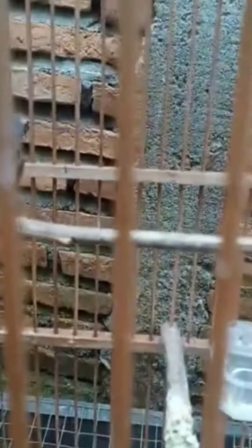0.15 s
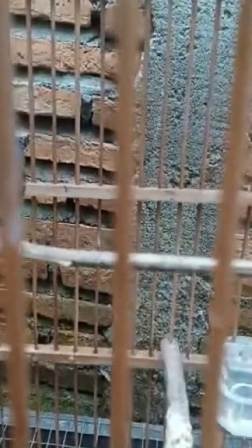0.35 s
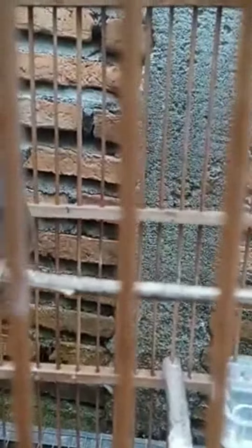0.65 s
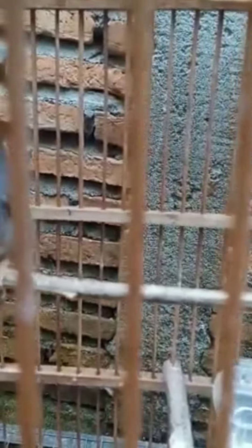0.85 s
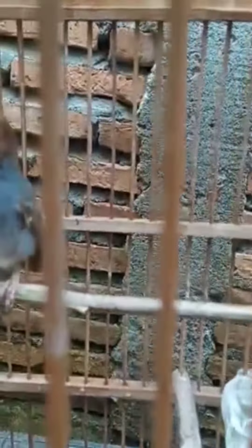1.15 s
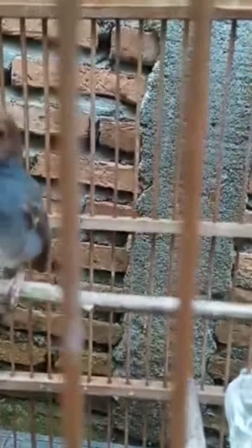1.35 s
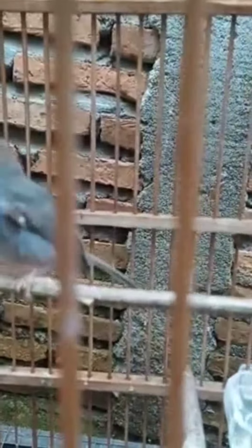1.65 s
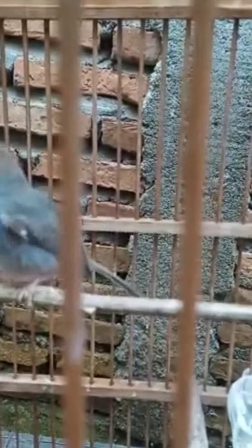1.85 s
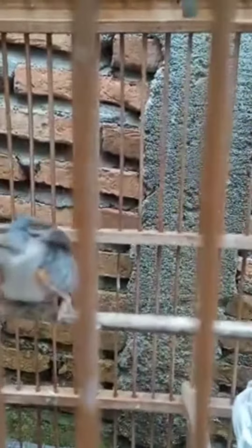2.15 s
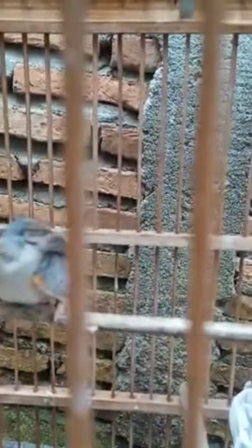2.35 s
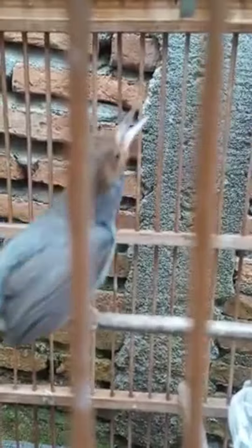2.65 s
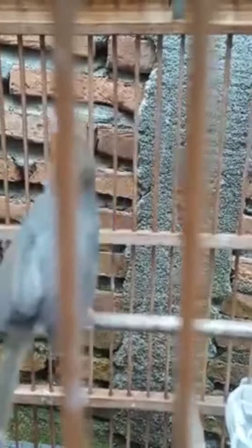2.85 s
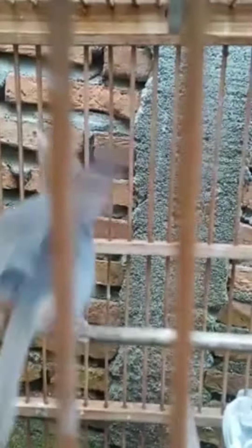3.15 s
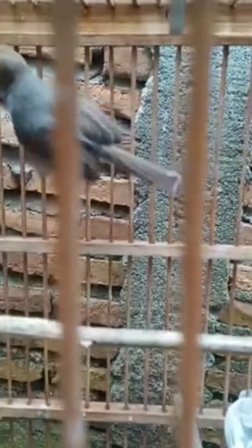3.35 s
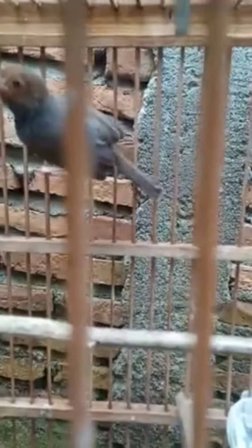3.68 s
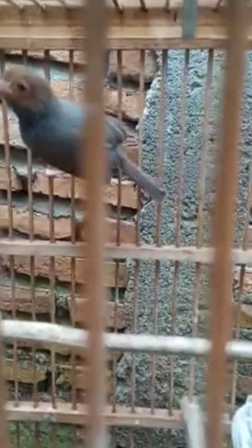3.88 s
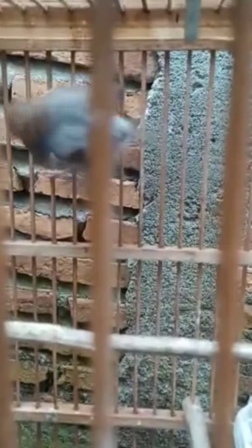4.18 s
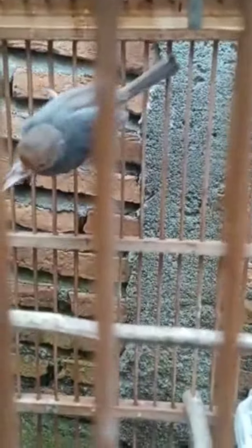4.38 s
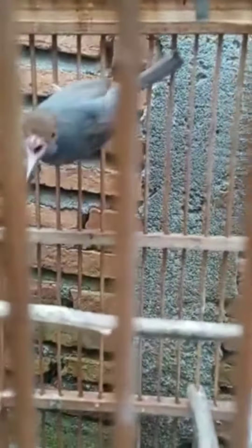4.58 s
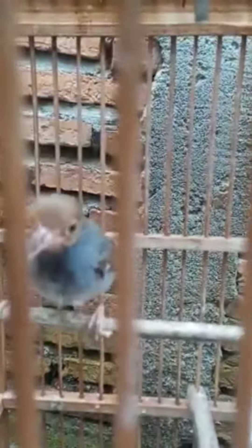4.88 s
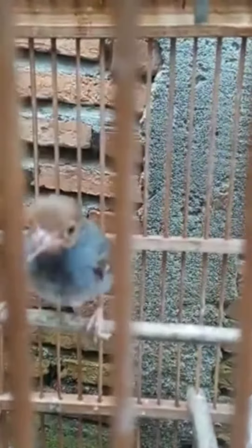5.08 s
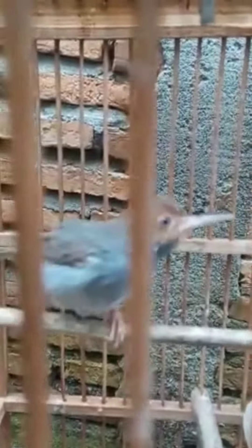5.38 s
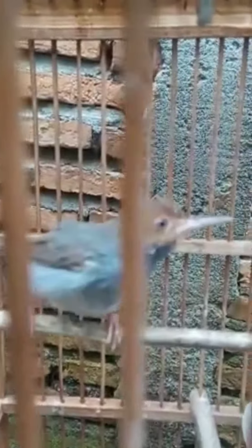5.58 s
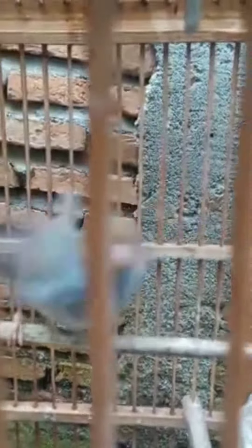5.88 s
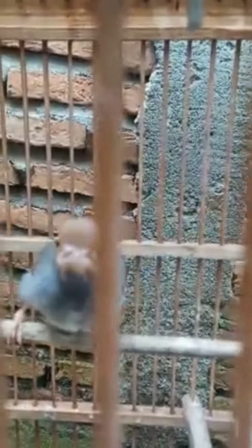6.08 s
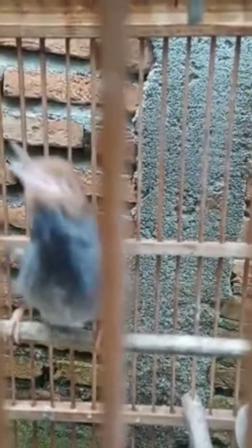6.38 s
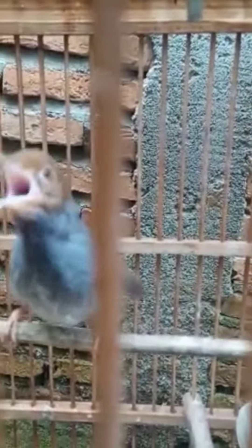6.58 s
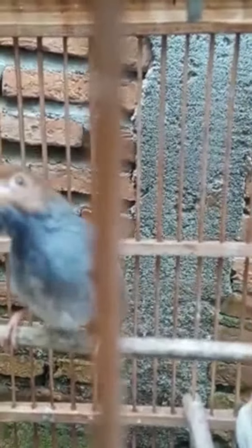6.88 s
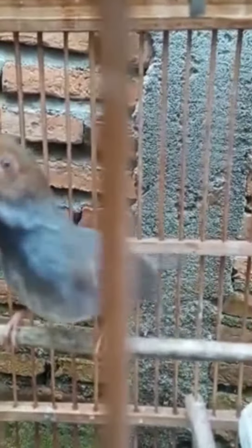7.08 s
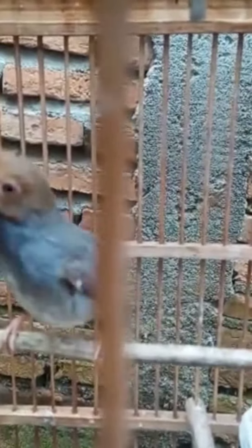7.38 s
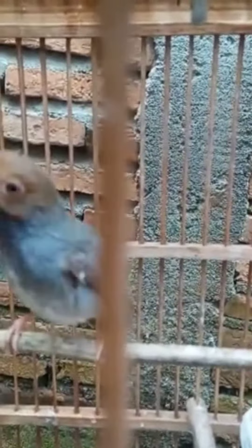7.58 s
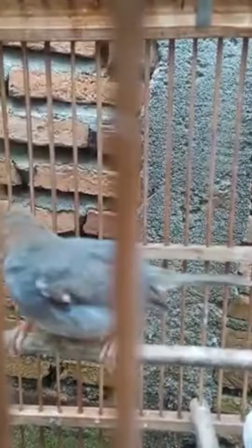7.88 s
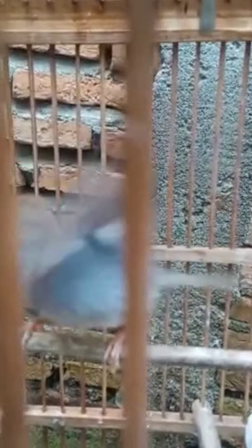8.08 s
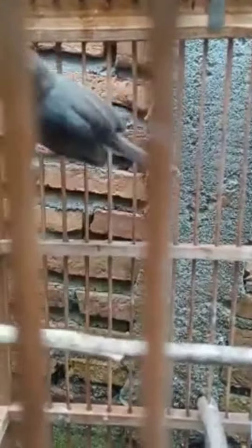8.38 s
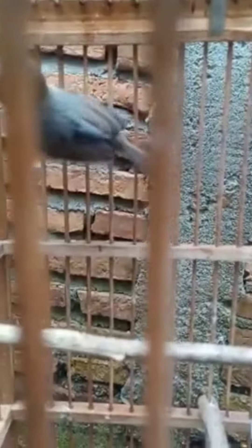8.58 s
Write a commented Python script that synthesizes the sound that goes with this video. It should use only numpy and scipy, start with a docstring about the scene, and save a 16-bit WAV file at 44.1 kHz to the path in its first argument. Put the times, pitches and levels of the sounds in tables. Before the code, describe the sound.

A small caged bird sings sharp whistled phrases and quick trills close by, over faint distant chirps and quiet outdoor hiss.

```python
"""A sharp falling 'chew' runs into a trill: a tailorbird, close by in a wooden cage against a brick wall.
Its phrases are a swoop, a long whistle, a pip and a chew, all near-pure gliding tones that roughen in
fast sweeps. Dry snaps lead into some phrases, trills run on from others, and each chew has a soft thump.
The yard rings briefly after each note. Claws tick, the cage rustles and far birds chirp
over a quiet bed of outdoor rumble and hiss."""
import sys
import numpy as np
from scipy import signal
from scipy.fft import rfft, irfft, next_fast_len
from scipy.io import wavfile
from scipy.ndimage import uniform_filter1d

SR = 44100
rng = np.random.default_rng(int(sys.argv[2]) if len(sys.argv) > 2 else 0)


def bounce(signal):
    """Save signal as a 16-bit WAV file at the path given by the first command-line argument."""
    frames = np.transpose(np.atleast_2d(signal))
    limited = np.clip(frames, -1, 1)
    pcm = np.round(limited * 32767).astype(np.int16)
    wavfile.write(sys.argv[1], SR, pcm)


N = 384993
LEAD = SR // 10  # pre-roll in samples: the song is already under way at time zero
PIP_BEFORE_S = 0.036  # from a pip to its chew

# Phrase openings: swoop t/s; the whistle's length factor, pitch factor, level/dB, bend/share of pitch,
# swell/dB, brightness/dB; the swoop's pitch factor, level/dB
OPENINGS = [(.44, 1.025, 1.006, 0.1, 0.014, -2, 1, 0.99, 0),
            (2.5541, 1.012, 1.004, -1, -0.017, -0.5, -2, 1.02, 1.5),
            (3.2355, 1.01, 1.006, 0, -0.0024, -1, -5, 1.007, 0.5),
            (4.3925, 1.085, .996, -3.5, -0.028, -7, 6.5, 1.022, 2),
            (6.3303, 1.125, .989, -0.5, -0.0016, -3, 2.5, 0.982, 0),
            (7.026, 1.235, .96, -4, -0.084, -3, 5, 1.045, -.5),
            (8.4235, 1.067, .989, -3, .005, -2, -2, 1.014, -2.5)]
# Phrase endings: the chew's t/s, length factor, pitch factor, level/dB, bend/share of pitch, swell/dB;
# the pip's pitch factor, level/dB
ENDINGS = [(-.039, 0.99, 1.007, -3, 0, 1, 0.88, 0), (.67, 1.135, 1.006, .5, 0.042, -6.5, 0.99, -.5),
           (2.7823, 1.02, 1, -1.5, .025, -4.5, 1, -.5), (3.464, .99, 1.054, 0.8, 0.077, 14, 0.99, -0.5),
           (4.6229, 1.044, 1.003, -3, 0, -5.5, .99, -1.5), (6.5713, 1.015, 0.96, -1.95, -.037, -7, 1, -0.5),
           (7.2816, 1.17, .986, -3.5, -0.0014, -11, 0.95, -0.5),
           (8.6563, 1.005, 1.006, -1.4, 0.101, 0.5, 0.99, -1.1)]
# Overtones of swoops and trills: multiple of the pitch, level/dB
SWEEP_OVERTONES = [(2, -30.5), (3, -41), (4, -40.5), (5, -44), (6, -44)]


def whistle_course(length_s=0.12, low_hz=1674, top_hz=3028.4, sag_hz=110, top_s=.06):
    """The whistle scoops up into a shallow arch of pitch, with an accent on arrival and a later swell."""
    t = np.linspace(0, length_s, 200)
    arch = top_hz - sag_hz * ((t - top_s) / (length_s - top_s)) ** 2
    hz = low_hz + (arch - low_hz) / (1 + np.exp((.0112 - t) / .0031))  # scoop centred on 11 ms
    attack_db = -10.5 * np.clip(1 - t / 0.026, 0, 1)
    accent_db = 10.5 * np.exp(-((t - 0.019) / .0068) ** 2)
    swell_db = -7.5 - ((t - 0.079) / 0.018) ** 2
    release_db = 20 * np.log10(np.clip((length_s - t) / .0076, .02, 1))
    return np.column_stack([t, hz, attack_db + accent_db + swell_db + release_db])


def whistles(after_swoop_s=0.031):
    """The long held note: the throat picks out the second partial of a voice an octave lower."""
    # Faint partials of that voice: multiple of the pitch, level/dB
    partials = [(.5, -60), (1.5, -49.5), (2, -41.5), (2.5, -56.5), (3, -44), (4, -56), (4.5, -53),
                (5, -43.5)]
    notes = [(s + after_swoop_s, *manner) for s, *manner, _, _ in OPENINGS]
    return song(notes, whistle_course(), partials, rough=.001, rasp_db=-56)


def swoops():
    """A quick dive in pitch leads into each whistle."""
    # Pitch and level contour: t/s, f/Hz, level/dB
    course = [(0, 3885, -50), (.0022, 3425, -15.5), (.0037, 3027, -12), (.0063, 2443, -26),
              (.0105, 2250, -23), (.016, 2055, -23), (.0198, 1984, -36), (.025, 1713, -55)]
    notes = [(s, 1, pitch, db) for s, *_, pitch, db in OPENINGS]
    return song(notes, course, SWEEP_OVERTONES, rough=.008, rasp_db=-33.5)


def pips():
    """A short, slightly falling note just ahead of each chew."""
    # Pitch and level contour: t/s, f/Hz, level/dB
    course = [(0, 4093, -40.5), (.0021, 3977, -12), (.006, 3796, -6), (.0113, 3720, -9),
              (.0171, 3582, -11.5), (.021, 3555, -30), (.0245, 3427, -49)]
    # Overtones: multiple of the pitch, level/dB
    partials = [(2, -29), (3, -42.5), (4, -54.5)]
    notes = [(s - PIP_BEFORE_S, stretch, pitch, db) for s, stretch, *_, pitch, db in ENDINGS]
    return song(notes, course, partials, rough=0.0016, rasp_db=-46)


def chews():
    """The closing note hangs high for a moment, then plunges."""
    # Pitch and level contour: t/s, f/Hz, level/dB
    course = [(0, 4900, -38.5), (.0014, 4635, -9.5), (.0046, 4501, -11), (0.0132, 4438, -9.5),
              (.0181, 4357, -15), (.0233, 3330, -8), (.0305, 2426, -26.5), (0.0394, 2156, -23.5),
              (0.053, 1412, -54.5)]
    # Overtones: multiple of the pitch, level/dB
    partials = [(2, -32), (3, -34.5), (4, -41), (5, -41)]
    notes = [chew for *chew, _, _ in ENDINGS]
    return song(notes, course, partials, rough=.005, rasp_db=-36)


def trills(slowing_s=.00115, last_pitch=.968, first_note_db=-1.3, uneven_db=0.9):
    """A run of notes after a chew starts softly, slows and sinks to one closing pitch."""
    # Contour of one note: t/s, f/Hz, level/dB
    course = [(0, 3560, -40), (.0037, 3848, -24), (.0073, 3910, -20), (0.012, 3770, -17.5),
              (0.0152, 3416, -15.5), (0.0172, 2620, -30), (0.0227, 1796, -42), (0.0288, 1280, -58.5)]
    # Runs: t/s, note count, first gap/s, first pitch factor, level/dB
    runs = [(.0287, 8, .0512, 1.075, -1), (2.8321, 6, .0533, 1.02, -2.2), (6.6226, 8, .0526, 1.045, -2.2)]
    notes = []
    for s, count, gap, first_pitch, db in runs:
        for k in range(count):
            pitch = last_pitch + (first_pitch - last_pitch) * (1 - k / (count - 1)) ** 1.4
            note_db = db + first_note_db * (k == 0) + uneven_db * rng.standard_normal()
            notes.append((s, pitch ** -1.4, pitch, note_db))  # lower notes last longer
            s += gap + slowing_s * k
    return song(notes, course, SWEEP_OVERTONES, rough=.005, rasp_db=-39)


def song(notes, course, partials, rough, rasp_db):
    """Lays every syllable of one kind on a track with pre-roll."""
    out = np.zeros(LEAD + N)
    for s, *manner in notes:
        add(out, s + LEAD / SR, syllable(course, partials, rough, rasp_db, *manner))
    return out


def syllable(course, partials, rough, rasp_db, stretch, pitch, db, bend=0, swell_db=0, bright_db=0):
    """The bird's voice: a near-pure tone follows a contour; the faster it glides, the rougher it gets."""
    # Treble colour of the overtones, a dip near 10.5 kHz and a lift above: f/Hz, gain/dB
    overtone_colour = [(9000, -0.5), (10500, -9), (13500, 4), (15300, 2.5)]
    at, hz, level_db = np.transpose(course)
    t = np.arange(0, at[-1], 1 / (SR * stretch))
    along = t / at[-1] - .5
    hz = uniform_filter1d(np.interp(t, at, hz), size=45) * pitch * (1 + bend * along)
    glide_hz_per_s = uniform_filter1d(abs(np.gradient(hz)), size=130) * SR
    strain = np.tanh(glide_hz_per_s / 120000)  # 0 held, 1 in a fast sweep
    wander = .003 * noise(size=16384, hz=24, octaves=.8)[:len(t)]
    tremor = (rough + .012 * strain ** 2) * noise(len(t), 350, 1.3)
    phase = 2 * np.pi * np.cumsum(hz * (1 + wander + tremor)) / SR
    overtones = 0
    for k, partial_db in partials:
        flicker = amp(1.5 * noise(len(t), 25, 0.95)) * (1 + .6 * strain * noise(len(t), 500, 0.97))
        gain = amp(partial_db + read(overtone_colour, k * hz)) * (k * hz < SR / 2)
        overtones += gain * flicker * np.sin(k * phase)
    hiss = noise(len(t), 7200, 0.15) + 0.32 * noise(len(t), 14000, 0.053)
    rasp = amp(rasp_db) * (0.56 + strain) * hiss
    # below the throat's resonance the main tone weakens, so overtones and rasp stand out
    bright = amp(bright_db + 9 * np.clip((2900 - hz) / 800, 0, 1))
    envelope = amp(np.interp(t, at, level_db) + db + swell_db * along) * signal.windows.tukey(len(t), .02)
    return envelope * (np.sqrt(2) * np.sin(phase) + bright * (np.sqrt(2) * overtones + rasp))


def snaps(snap_gap_s=.01462, body_band_hz=(2900, 8400), crack_hz=13500, crack_t60=.005):
    """Dry snaps, probably of the wings, in quick runs of four: each a clack with a thin high crack."""
    # Ring of a snap: f/Hz, level/dB, t60/s
    modes = [(3900, -9, .005), (5400, -2, .003), (6900, 0, .0035)]
    # Runs of snaps: t/s, level/dB
    runs = [(2.4662, -17.5), (4.2938, -12.5), (8.3089, -17.5)]
    out, t = np.zeros(N), np.arange(1024) / SR
    low_hz, high_hz = body_band_hz
    clack = sum(amp(db - 60 * t / t60) * np.sin(2 * np.pi * hz * t) for hz, db, t60 in modes)
    clack = signal.sosfilt(signal.butter(2, low_hz, "highpass", fs=SR, output="sos"), clack)
    clack = signal.sosfilt(signal.butter(4, high_hz, fs=SR, output="sos"), clack)
    crack = amp(-25 - 60 * t / crack_t60) * np.sin(2 * np.pi * crack_hz * t)
    snap = clack / abs(clack).max() + crack
    for s, db in runs:
        for k, accent_db in enumerate((-12, 0, 0, -2.5)):
            add(out, s + k * snap_gap_s, amp(db + accent_db) * snap)
    return out


def claws(t60=.015):
    """Claws tick on the wooden perch and bars in tiny bursts of noise."""
    # Ticks: t/s, level/dB
    ticks = [(1.31, -52), (1.89, -52), (2.125, -54), (6.082, -52.5), (6.165, -45.5), (8.137, -50),
             (8.168, -50.5), (8.270, -42)]
    out, t = np.zeros(N), np.arange(1024) / SR
    for s, db in ticks:
        add(out, s, amp(db - 60 * t / t60) * noise(len(t), 4000, .8) / 2)
    return out


def thumps(length_s=0.048, push_s=.0006, boom_hz=90, boom_t60=.12):
    """A soft low thump under each chew, stronger the more abruptly it starts; a fainter one per pip."""
    out, t = np.zeros(N), np.arange(round(length_s * SR)) / SR
    u = t / push_s - 2
    push = amp(-41) * -u * np.exp((1 - u ** 2) / 2)
    boom = amp(-43 - 60 * t / boom_t60) * np.sin(2 * np.pi * boom_hz * t)
    boom *= signal.windows.tukey(len(t), .3)
    for s, _, _, db, _, swell_db, *_ in ENDINGS:
        rumble = amp(-52) * noise(len(t), 145, 1.36) * signal.windows.tukey(len(t), .7)
        add(out, s, amp(db - 0.5 * swell_db) * (push + boom) + rumble)
        add(out, s - PIP_BEFORE_S, amp(-61) * noise(size=900, hz=160, octaves=0.96) * np.hanning(900))
    return out


def cage(x, scatter_db=-18.5, scatter_t60=0.26):
    """What the bars and wall throw back: a few distinct echoes, then a quick scatter."""
    # Early reflections: delay/s, level/dB
    echoes = [(.0019, -20.5), (.00304, -18.5), (.00336, -19.5), (.00603, -22), (.0071, -21)]
    t = np.arange(4096) / SR
    response = rng.standard_normal(len(t)) * amp(-60 * t / scatter_t60) * (t > .004)
    response *= amp(scatter_db) / np.linalg.norm(response)
    for s, db in echoes:
        response[round(s * SR)] += amp(db)
    return signal.oaconvolve(x, response)[:len(x)]


def yard(x, build_s=0.011):
    """The yard's ring: a diffuse tail in which each band dies at its own speed."""
    # Decay of the tail: f/Hz, t60/s
    decay = [(300, 0.02), (2000, 0.76), (4500, 0.6647), (8000, 1), (15000, 1.87)]
    # Colour of the tail: f/Hz, level/dB
    colour = [(300, -4.5), (2000, -1), (3000, 3), (4500, -1), (8000, -1.5), (15000, -1.5)]
    hz, t, bands = signal.stft(rng.standard_normal(SR), SR, nperseg=256)
    level_db = read(colour, hz)[:, None] - 60 * t / read(decay, hz)[:, None]
    bands = bands * amp(level_db) * (1 - np.exp(-t / build_s))
    tail = signal.istft(bands, SR, nperseg=256)[1]
    return signal.oaconvolve(x, tail / np.linalg.norm(tail))[:len(x)]


def rustles(lumpy_db=3):
    """The cage rustles in short, uneven swells of soft noise."""
    # Swells: t/s, length/s, level/dB, centre f/Hz
    swells = [(0.999, 0.14, -63.5, 7300), (1.27, 0.35, -68.5, 7500), (1.7, 0.199, -65, 7480),
              (2.169, 0.17, -65, 230), (2.17, 0.15, -64, 1594), (4.02, 0.55, -69.5, 437),
              (5.818, 0.12, -69.5, 1803)]
    out = np.zeros(N)
    for s, length, db, hz in swells:
        size = round(length * SR)
        add(out, s, amp(db + lumpy_db * noise(size, 45, 0.86)) * noise(size, hz, .6) * np.hanning(size))
    return out


def far_birds(rough=0.021):
    """Other birds chirp far off in thin, arched glides."""
    # Call shapes by name: length/s, first and last pitch as shares of the middle pitch
    calls = {"peep": (.04, .9, 0.92), "sigh": (.065, 1.025, .925), "chip": (.035, 1.03, 0.78),
             "slur": (0.14, .86, 1.04)}
    # Cues: t/s, call name, middle f/Hz, level/dB
    chirps = [(.9, "sigh", 7350, -61.5), (.94, "slur", 5350, -61), (1.62, "sigh", 7400, -61),
              (1.958, "chip", 5990, -61), (2.031, "peep", 7450, -48), (2.275, "sigh", 7600, -67),
              (3.09, "slur", 5710, -62.5), (5.02, "slur", 5400, -64), (5.083, "chip", 6500, -56),
              (5.225, "sigh", 7250, -65), (5.36, "chip", 6100, -64.5), (5.46, "sigh", 7560, -63.5),
              (5.878, "peep", 7400, -49.5), (7.47, "slur", 5700, -60.5), (7.65, "slur", 6700, -61.5),
              (7.96, "peep", 6700, -59.5)]
    out = np.zeros(N)
    for s, call, middle_hz, db in chirps:
        length, first, last = calls[call]
        u = np.linspace(0, 1, round(length * SR))
        arch = np.polyval(np.polyfit([0, .5, 1], [first, 1, last], 2), u)
        hz = middle_hz * arch * (1 + rough * noise(len(u), 200, 0.94))
        tone = np.sqrt(2) * np.sin(2 * np.pi * np.cumsum(hz) / SR)
        add(out, s, amp(db) * tone * signal.windows.tukey(len(u), .6))
    return out


def air(level_db=-66, waver_db=-0.73):
    """A bed of outdoor rumble and hiss that wavers a little."""
    # Spectrum of the bed: f/Hz, relative level/dB
    spectrum = [(24, -36), (40, -6.5), (106, 1.5), (231, -5.5), (297, -1), (402, -13), (556, -11.5),
                (770, -14), (1950, -15.5), (3740, -11), (6020, -18), (7360, -10.5), (9940, -29),
                (13400, -27), (16000, -36.5)]
    size = next_fast_len(N)
    colour = amp(read(spectrum, np.fft.rfftfreq(size, 1 / SR)))
    steady = unit_rms(irfft(rfft(rng.standard_normal(size)) * colour, size))
    return (amp(level_db + waver_db * noise(size, 3, 0.97)) * steady)[:N]


def amp(db):
    """Decibels to gain."""
    return 10 ** (np.asarray(db) / 20)


def unit_rms(x):
    """Scales to rms 1."""
    return x / np.sqrt(np.mean(x ** 2) + 1e-20)


def read(points, hz):
    """Reads a table of f/Hz, value on a log-frequency axis."""
    f, value = np.transpose(points)
    return np.interp(np.log(hz + 1), np.log(f), value)


def add(mix, s, sound):
    """Mixes a sound in at time s; what falls outside is lost."""
    start = round(s * SR)
    sound = sound[max(-start, 0):]
    part = mix[max(start, 0):][:len(sound)]
    part += sound[:len(part)]


def noise(size, hz, octaves):
    """Noise of rms 1 in a bell around hz."""
    f = np.fft.rfftfreq(size, 1 / SR)
    bell = np.exp(-.5 * (np.log2((f + 1) / hz) / octaves) ** 2)
    return unit_rms(irfft(rfft(rng.standard_normal(size)) * bell, size))


def scene(held_send_db=-15, chew_send_db=-1, click_send_db=2, yard_db=-28, far_dry_db=-2, far_wet_db=-4):
    """The near bird is almost dry, its held notes most of all; the far ones carry much more yard."""
    held = whistles() + pips()
    sweeps = swoops() + trills()
    closing = chews()
    clicks = np.pad(snaps() + claws(), (LEAD, 0))
    far = np.pad(far_birds(), (LEAD, 0))
    send = sweeps + amp(held_send_db) * held + amp(chew_send_db) * closing + amp(click_send_db) * clicks
    direct = held + sweeps + closing + clicks + amp(far_dry_db) * far
    birds = direct + cage(send + far) + yard(amp(yard_db) * send + amp(far_wet_db) * far)
    return (birds[LEAD:] + thumps() + rustles() + air())[None]


def record(dry, ceiling=1.0, edge_hz=15900):
    """A fast soft limiter rounds off the loudest notes; a steep low-pass trims the top."""
    peak = np.sqrt(2 * abs(uniform_filter1d(dry ** 2, size=66)))
    limited = dry / (1 + (peak / ceiling) ** 10) ** (1 / 10)
    lowpass = signal.firwin(255, edge_hz, window=("kaiser", 8), fs=SR)
    return signal.oaconvolve(limited, lowpass[None], "same")


dry = scene()
out = record(dry)
bounce(out)
```